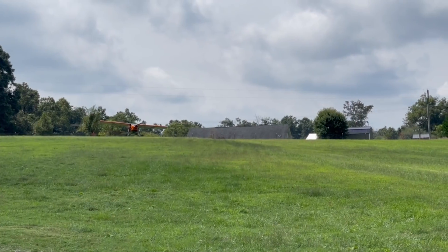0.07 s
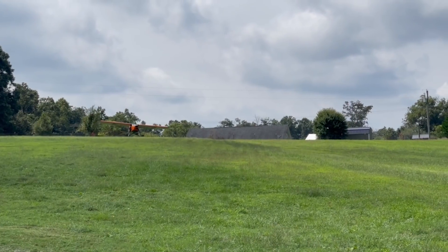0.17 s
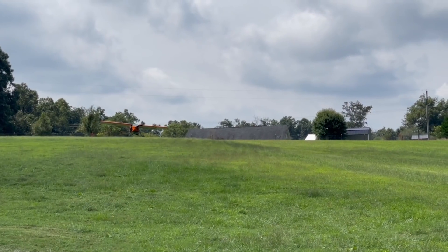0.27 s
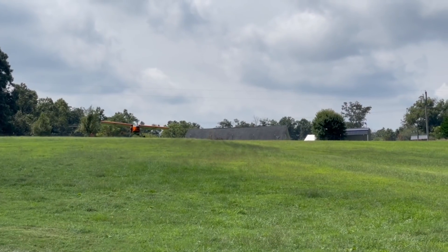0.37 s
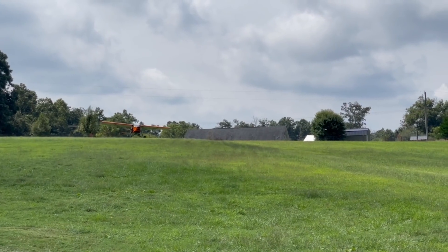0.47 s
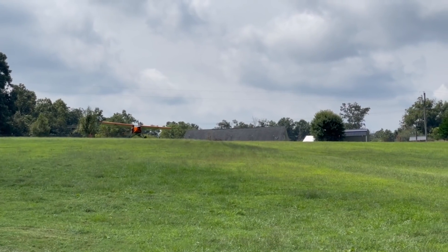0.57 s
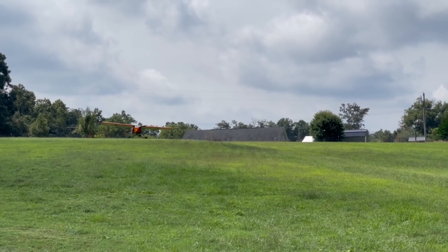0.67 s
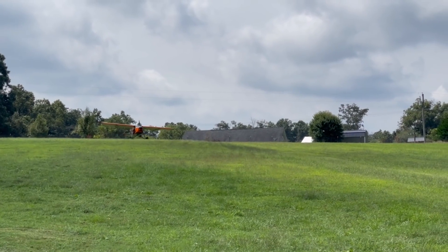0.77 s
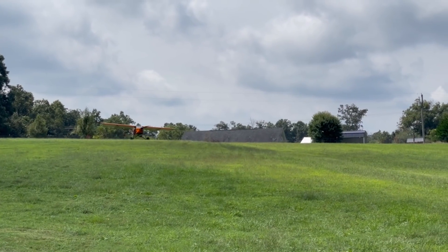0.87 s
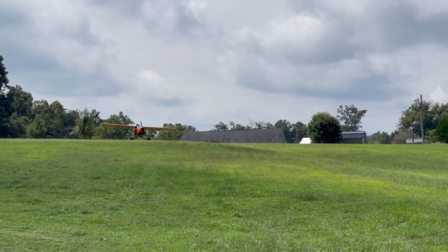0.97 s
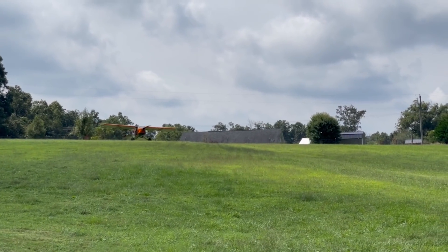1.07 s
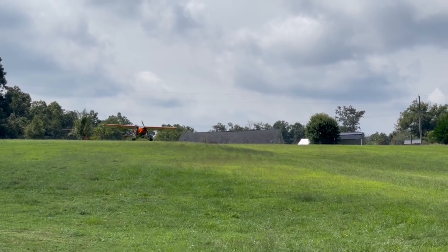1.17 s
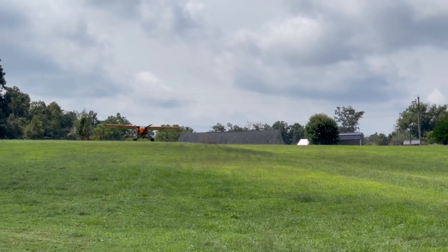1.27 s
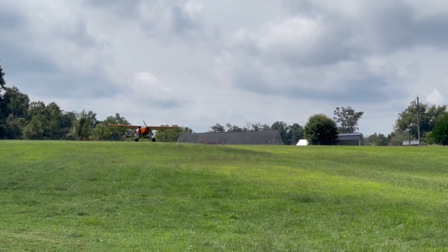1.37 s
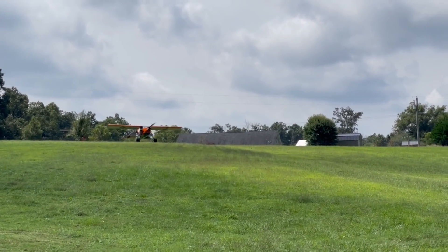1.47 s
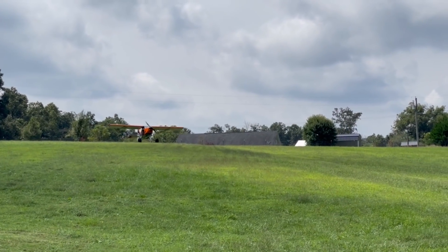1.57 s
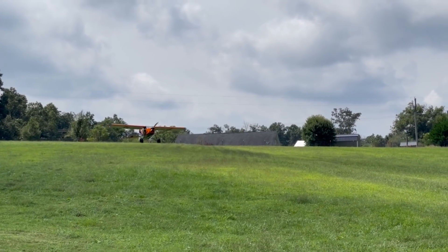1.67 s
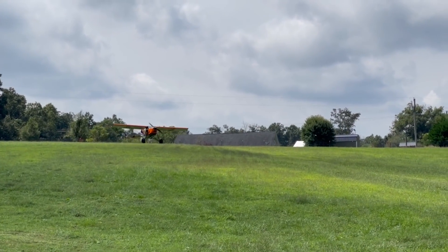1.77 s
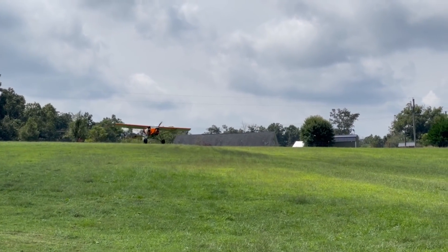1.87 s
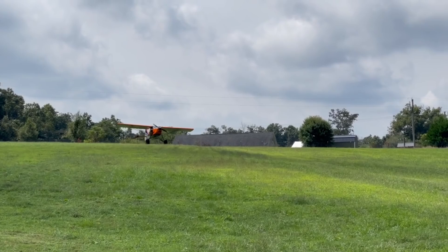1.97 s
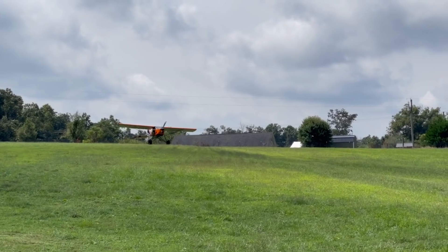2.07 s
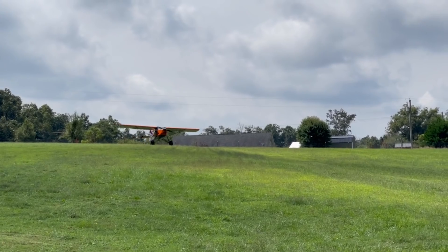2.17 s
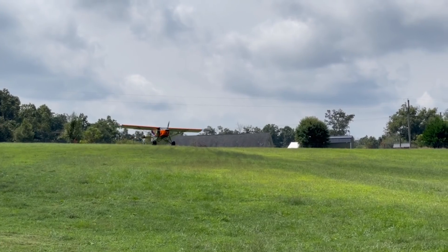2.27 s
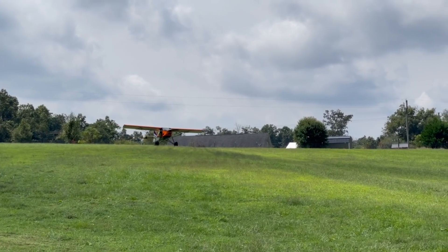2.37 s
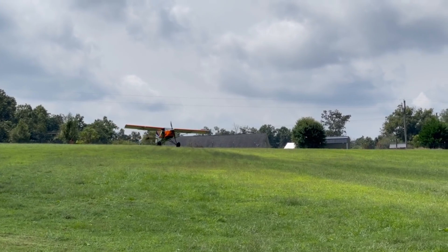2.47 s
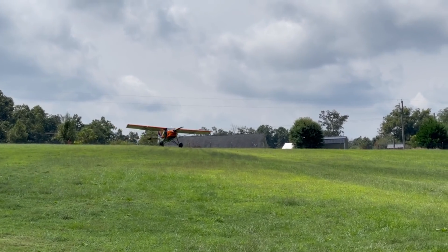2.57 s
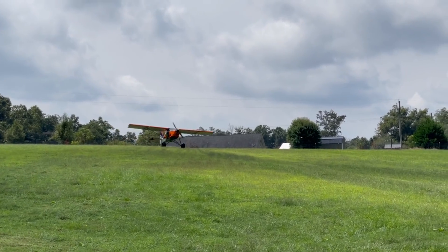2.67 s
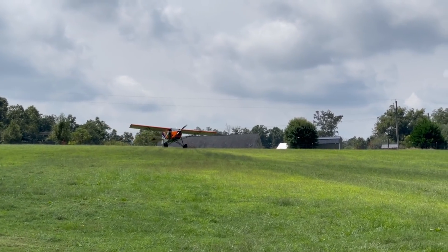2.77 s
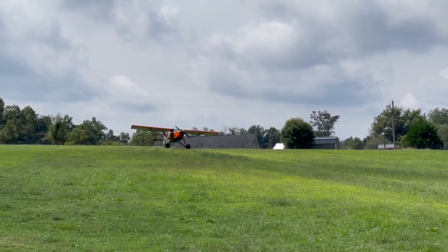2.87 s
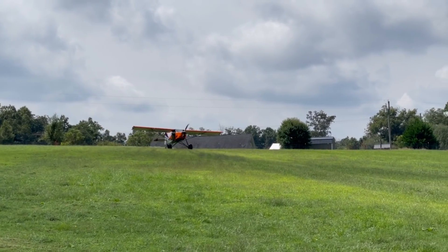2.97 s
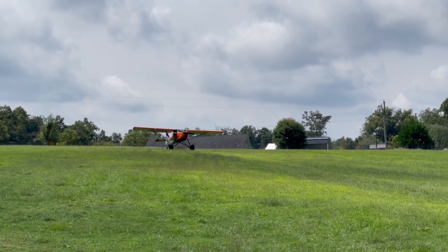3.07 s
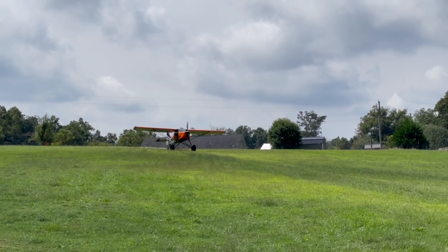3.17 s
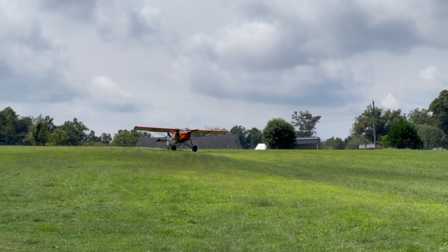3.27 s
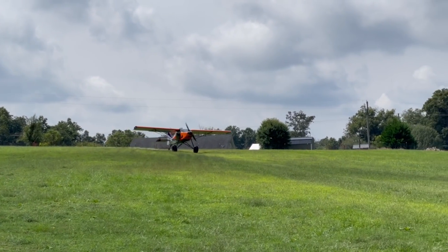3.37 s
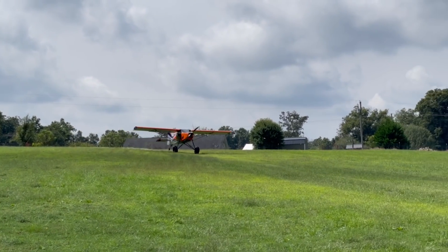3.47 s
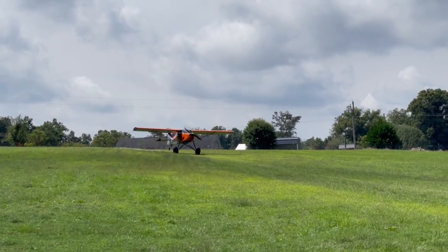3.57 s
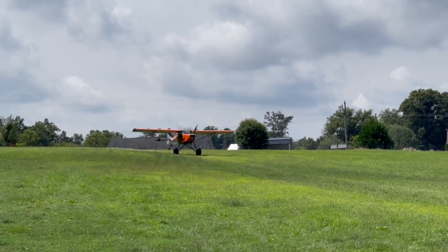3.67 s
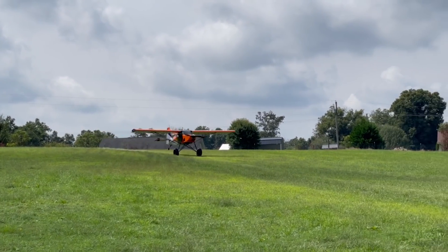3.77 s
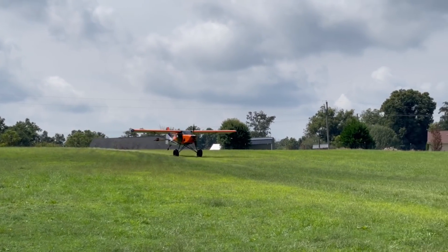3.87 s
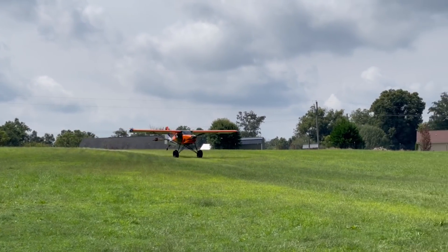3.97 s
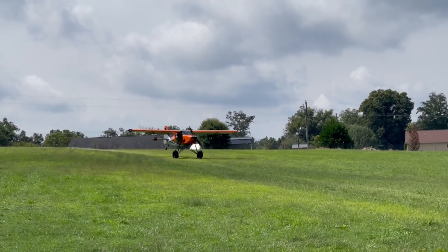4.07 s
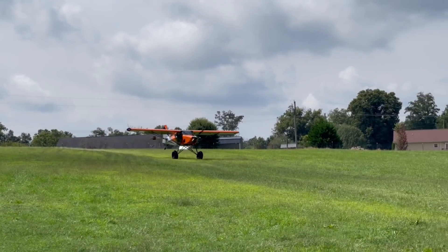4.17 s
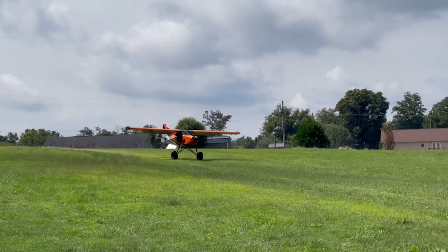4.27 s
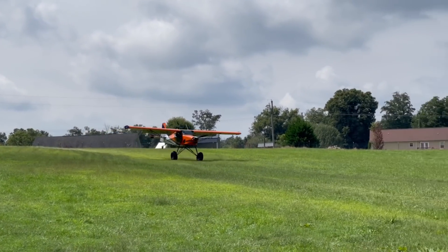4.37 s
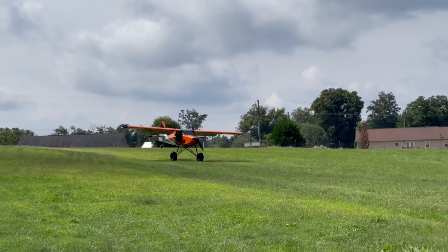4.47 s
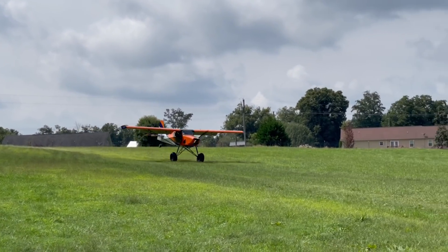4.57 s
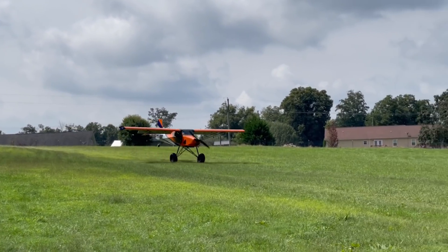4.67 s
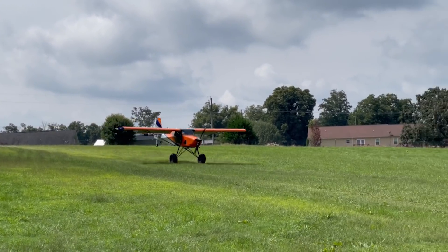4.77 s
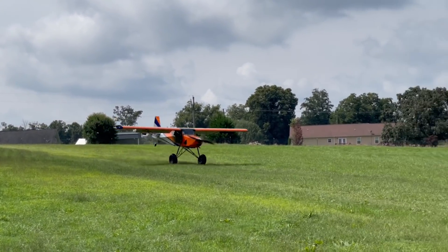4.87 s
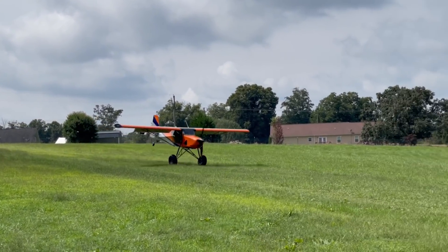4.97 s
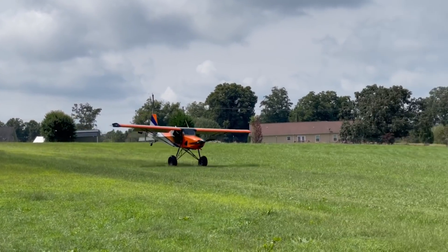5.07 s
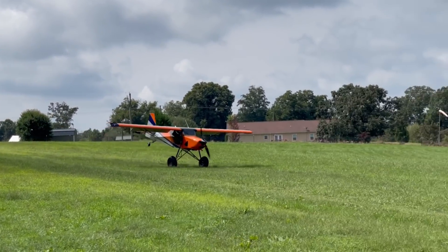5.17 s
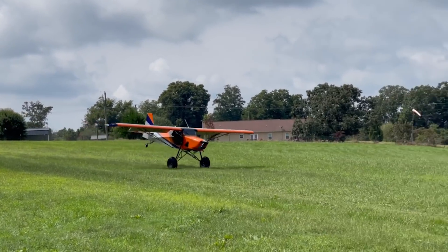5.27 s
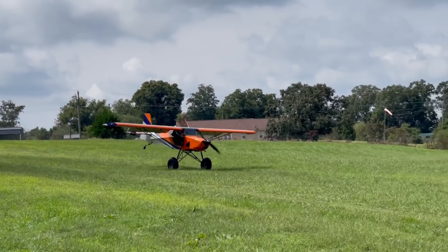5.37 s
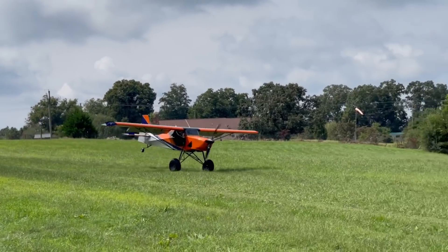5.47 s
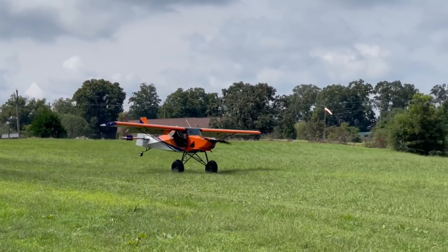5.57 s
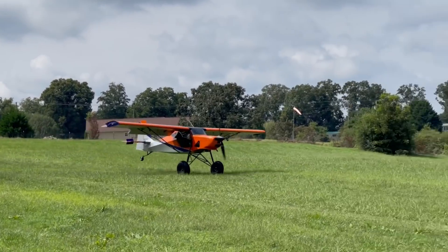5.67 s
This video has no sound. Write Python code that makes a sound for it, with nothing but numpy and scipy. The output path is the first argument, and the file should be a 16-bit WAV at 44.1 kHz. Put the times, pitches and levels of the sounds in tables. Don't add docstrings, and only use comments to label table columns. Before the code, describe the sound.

A small propeller plane runs toward the listener over grass, its steady engine drone rising slightly amid a roaring, throbbing rush of air.

```python
import sys
import numpy as np
from scipy import signal
from scipy.fft import rfft, irfft, next_fast_len
from scipy.io import wavfile
from scipy.ndimage import uniform_filter1d

SR = 44100
rng = np.random.default_rng(int(sys.argv[2]) if len(sys.argv) > 2 else 0)


def voltage_ratio(level):
    return 10 ** (np.asarray(level, float) / 20)


def generate_wav(sig):
    pcm = np.round(np.clip(np.atleast_2d(sig).T, -1, 1) * 32767).astype(np.int16)
    wavfile.write(sys.argv[1], SR, pcm)


N = 252252
BLADES_PER_FIRING = 11 / 28


def evened(x):
    return x / np.sqrt(np.mean(x ** 2) + 1e-20)


def read(points, hz):
    f, value = np.transpose(points)
    return np.interp(np.log(hz + 1), np.log(f + 1), value)


def curves(rows, t):
    s, *columns = np.transpose(rows)
    return [np.interp(t, s, c) for c in columns]


def wander(top_hz):
    t = np.arange(0, N, 64) / SR
    slow = 0
    for f in np.geomspace(.3, top_hz, num=16):
        slow = slow + np.sin(2 * np.pi * (f * t + rng.random())) / np.sqrt(f)
    return np.interp(np.arange(N) / SR, t, evened(slow))


def tone(turns, db):
    return np.sqrt(2) * voltage_ratio(db) * np.cos(2 * np.pi * turns)


def pace(t):
    start, gain, top = 4.7, 6.46, 29.5
    speed = np.minimum(start + gain * t, top)
    return speed, (speed - start) / (top - start)


# time in seconds, clearness in dB.
AIR_CLEARNESS = [(0.0, 0.35), (0.8, -0.14), (1.31, 0.4), (1.9, -3.5), (2.3, -1.5), (2.5, -0.1), (3.02, 2.5),
                 (3.5, -3.5), (3.7, -1.9), (4.09, 1.5), (4.28, -0.4), (4.6, -1.15), (4.92, -4), (5.23, 0),
                 (5.5, -0.5), (5.72, -0.3)]


def clear_air(t):
    return curves(AIR_CLEARNESS, t)[0]


# band in Hz, dB gained with speed, dB gained closing in,
# dB per dB of clear air, dB of opening blast.
ROAR_BANDS = [
    (900, 16.5, 1, .35, 8),
    (2300, 0, 5.5, 1.0, 2),
    (3830, 0, 6.5, 1.57, 4.5),
    (7500, 0.5, 6.5, 0.97, 1.1),
]
# frequency in Hz, gain in dB.
CLOSING_GAIN = [(30, 0), (60, 8), (110, 8), (170, -2.5), (235, -4), (290, 15), (450, 6.5), (800, -2.5),
                (8000, 2), (12500, 11.5)]
# frequency in Hz, density in dB per Hz.
LOW_COLOUR = [(24, -60), (34, -24), (48, -29), (62, -18.5), (100, -13), (150, -17.5), (190, -11),
              (240, -25), (270, -37.5), (320, -35.5)]
# frequency in Hz, density in dB per Hz.
HIGH_COLOUR = [(320, -36), (560, -27.5), (900, -23), (1500, -24.5), (2100, -29.5), (3000, -30.5),
               (3600, -34.5), (4450, -32.5), (5200, -37), (6500, -35.5), (7300, -37), (10000, -35),
               (11600, -44), (13100, -63.5)]
# frequency in Hz, level in dB re the shared sound.
DIFFUSE_LEVEL = [(30, -26), (80, -27), (200, -26), (500, -16), (1000, -16.5), (2000, -13.5), (4400, -9.5),
                 (5500, -14), (5800, -60), (7500, -60), (7650, -17), (8300, -5), (8550, -73), (20000, -64)]


def slipstream(firings):
    frames, hz = N // 512 + 5, np.fft.rfftfreq(2048, 1 / SR)
    t = np.arange(frames) * 512 / SR
    band_hz, *follows = np.transpose(ROAR_BANDS)
    blast = np.exp(-((t - .15) / 0.36) ** 2)
    levels = np.transpose(follows) @ [pace(t)[1], t / t[-1], clear_air(t), blast]
    levels -= levels.mean(axis=1, keepdims=True)

    bands = np.arange(len(ROAR_BANDS))
    place = np.interp(np.log(hz + 1), np.log(band_hz), bands)
    share = np.maximum(1 - abs(place[:, None] - bands), 0)
    share = share * np.clip((hz[:, None] - 250) / 500, 0, 1)
    closing_db = np.outer(read(CLOSING_GAIN, hz), (np.arange(frames) / frames) ** 1.46 - .4)
    colour_db = np.where(hz < LOW_COLOUR[-1][0], read(LOW_COLOUR, hz), read(HIGH_COLOUR, hz))

    a, b, c, d, patches = rng.standard_normal((frames, len(hz), 5)).T
    patches_db = uniform_filter1d(patches, size=40, axis=0)
    patches_db = evened(uniform_filter1d(patches_db, size=16, axis=1))
    z = np.array([a + 1j * b, (c + 1j * d) * voltage_ratio(read(DIFFUSE_LEVEL, hz))[:, None]])
    z *= voltage_ratio(colour_db[:, None] + share @ levels + closing_db + patches_db)
    roar = signal.istft(z, nperseg=2048, noverlap=1536)[1][:, :N]

    blade_throb = 0.1 * np.cos(2 * np.pi * BLADES_PER_FIRING * firings)
    cylinder_throb = 0.058 * np.cos(np.pi / 2 * firings + 1)
    flutter = evened(uniform_filter1d(rng.standard_normal(N), size=300))
    hiss = signal.sosfilt(signal.butter(2, 3500, "high", fs=SR, output="sos"), roar)
    mixed = roar * (1 + blade_throb + cylinder_throb) + 0.087 * flutter * hiss
    return voltage_ratio(-24.5) * mixed / np.std(roar[0])


def blade_turns(t, firings):
    return BLADES_PER_FIRING * firings - .5 - .35 * np.clip((t - 3.7) / .5, 0, 1)


def tree_echo(t, firings):
    gap_m = 2.3 + np.cumsum(pace(t)[0]) / SR
    echoed = blade_turns(t, firings) - gap_m / 4.5
    level_db = -31 + 3.5 * np.cos(2 * np.pi * (t - .4) / 2.1)
    level_db = level_db - 9.5 * np.maximum(t - 4.7, 0)
    octave = tone(2 * echoed + 0.18 * wander(6.6), level_db - 3 + 3 * wander(4.92))
    return tone(echoed, level_db + 1.5 * wander(8.6)) + octave


# multiple of firing rate, multiple of blade rate, far level in dB, near level in dB.
WEAK_ORDERS = [(0, .5, -48, -52), (.25, 0, -51, -44), (.5, 0, -44, -37), (0, 1.5, -50, -41),
               (.75, 0, -41, -39), (1.25, 0, -49, -46), (1, 1, -68, -41), (1, 2, -70, -44),
               (0, 6, -59, -56), (2, 0, -61, -62), (1, 3, -66, -50), (2, 1, -60, -52), (0, 7, -58, -54),
               (2, 2, -64, -46), (3, 0, -66, -41), (4, 0, -62, -50), (4.25, 0, -62, -46),
               (4.5, 0, -58, -39), (5.25, 0, -60, -45), (7, 0, -60, -48)]


def weak_orders(t, firings):
    out, near = 0, t / t[-1]
    for per_firing, per_blade, far_db, near_db in WEAK_ORDERS:
        swing = near ** 2 if per_firing * per_blade else near
        turns = per_firing * firings + per_blade * BLADES_PER_FIRING * firings
        turns = turns + rng.random() + 0.067 * wander(5.5)
        out = out + tone(turns, far_db + (near_db - far_db) * swing + 2 * wander(5))
    return out


# time in seconds, half width in seconds, mesh gain in dB,
# octave gain in dB.
WHINE_BEAMS = [
    (1.5, .2, 2, 8),
    (2.6, 0.36, 6, 3),
    (3.8, 0.1, 7, 3),
    (4.08, .16, 0.5, 8),
    (4.45, 0.1, 5.5, 8.5),
    (4.78, .2, 0, 9.5),
    (5.5, 0.15, 6, 1),
]


def gearbox(t, firings):
    clear, near = clear_air(t), t / t[-1]
    mesh_db = -59 + 22.5 * near + 2.5 * clear
    octave_db = -56 + 12 * near + clear
    for s, half, mesh_gain, octave_gain in WHINE_BEAMS:
        beam = np.exp(-((t - s) / half) ** 2)
        mesh_db = mesh_db + mesh_gain * beam
        octave_db = octave_db + octave_gain * beam

    warble = .9 + .05 * clear + np.interp(t, (4.8, 5.25), [0, .7])
    blade_angle = 2 * np.pi * BLADES_PER_FIRING * firings
    sweep = warble * np.sin(blade_angle) / (2 * np.pi)
    chop = 1 + .35 * warble * np.cos(blade_angle)
    mesh = chop * tone(11 * firings + sweep + .08 * wander(12), mesh_db + wander(12))
    octave_turns = 22 * firings + 1.9 * sweep / np.maximum(warble, 1) + .12 * wander(15)
    octave = tone(octave_turns, octave_db + 1.5 + wander(15))
    rattle = evened(uniform_filter1d(rng.standard_normal(N), size=170))
    return mesh + octave * (1 + .5 * rattle)


def exhaust(t, firings):
    level_db = -27 + 3.5 * pace(t)[1]
    return tone(firings - .11 + 0.023 * wander(5), level_db + 0.91 * wander(25))


# time in seconds, level in dB.
BLADE_LEVEL = [(0.0, -39), (1.4, -29.5), (1.75, -27), (2.37, -31.5), (2.96, -23), (3.5, -30.5),
               (3.75, -25.5), (4.14, -33), (4.5, -25), (5.4, -14.5), (5.72, -15.5)]
# time in seconds, level in dB.
SECOND_LEVEL = [
    (0.0, -17.5),
    (0.2, -30.5),
    (1.0, -31),
    (1.5, -25),
    (2.37, -25),
    (3.16, -34),
    (3.94, -23),
    (4.73, -35.5),
    (5.15, -30.5),
    (5.72, -23.5),
]
# time in seconds, peak level in dB.
THIRD_FLARES = [
    (0.15, -29),
    (0.68, -30.5),
    (1.47, -39),
    (2.3, -36),
    (2.6, -39),
    (3.73, -42),
    (4.05, -41),
    (4.8, -32),
    (5.42, -34),
    (5.7, -28),
]


def propeller(t, firings):
    blades = BLADES_PER_FIRING * firings
    first = tone(blade_turns(t, firings), curves(BLADE_LEVEL, t)[0] + 0.57 * wander(10))
    second = tone(2 * blades + 0.17 + 0.11 * wander(18), curves(SECOND_LEVEL, t)[0] + 1.4 * wander(8.4))
    flare = voltage_ratio(-39.5)
    for s, db in THIRD_FLARES:
        flare = flare + voltage_ratio(db) * np.exp(-((t - s) / 0.076) ** 2)
    return first + second + flare * tone(3 * blades + 0.2 * wander(11.0), -3.4)


# time in seconds, rate in Hz.
FIRING_RATE = [
    (0.0, 193.5),
    (0.5, 194.1),
    (1.32, 196.6),
    (3.08, 200.9),
    (3.96, 202.8),
    (4.84, 203.35),
    (5.72, 204.1),
]


def scene():
    t = np.arange(N) / SR
    firings = np.cumsum(curves(FIRING_RATE, t)[0]) / SR
    shared, diffuse = slipstream(firings)
    shared = shared + tree_echo(t, firings) + weak_orders(t, firings) + gearbox(t, firings)
    shared = shared + exhaust(t, firings) + propeller(t, firings)
    return np.array([shared + diffuse, shared - diffuse])


def low_pass(x):
    return signal.sosfilt(signal.butter(12, 13100, fs=SR, output="sos"), x)


# frequency in Hz, phase in radians.
PHASE_BETWEEN_PORTS = [(20, .03), (1500, .12), (2150, .15), (3100, .45), (4400, .35), (5700, 0), (8750, 0),
                       (9390, -1.6), (10250, -np.pi), (11000, -4.7), (11700, -2 * np.pi),
                       (12350, -2 * np.pi), (13000, -7.2), (22050, -7.2)]


def record(dry):
    size = next_fast_len(N + 4096)
    hz = np.fft.rfftfreq(size, 1 / SR)
    slip = np.exp(.5j * read(PHASE_BETWEEN_PORTS, hz))
    slip = slip * voltage_ratio(-.2 * (hz < 800))
    dry = signal.sosfilt(signal.butter(4, 33, "high", fs=SR, output="sos"), dry)
    ports = irfft(rfft(dry, size) * np.array([slip, 1 / slip]), size)[:, :N]
    return low_pass(ports)


dry = scene()
out = record(dry)
generate_wav(out)
```